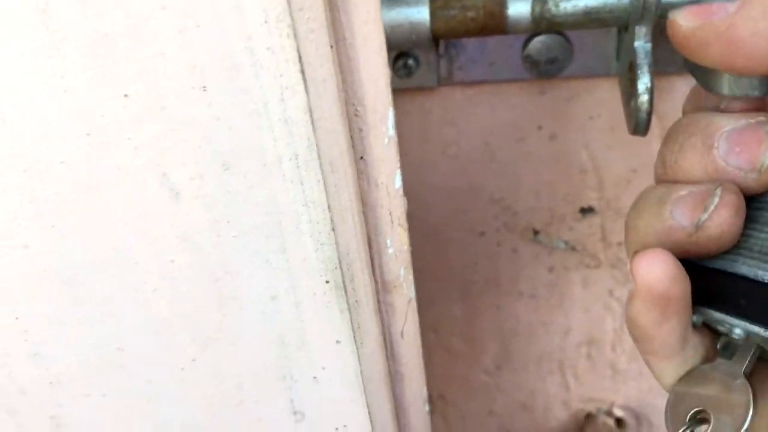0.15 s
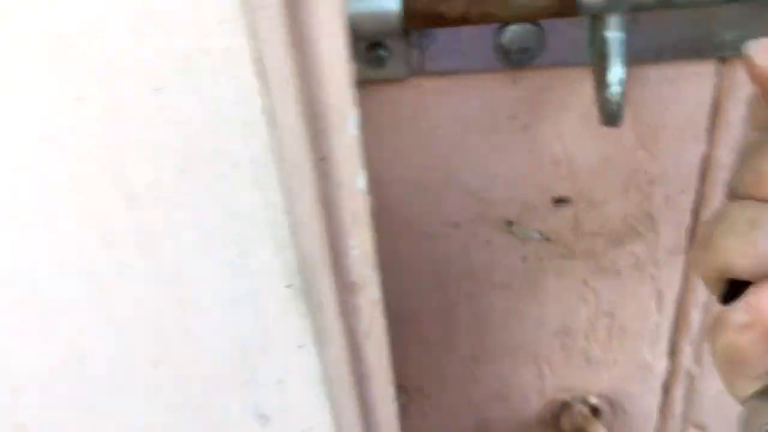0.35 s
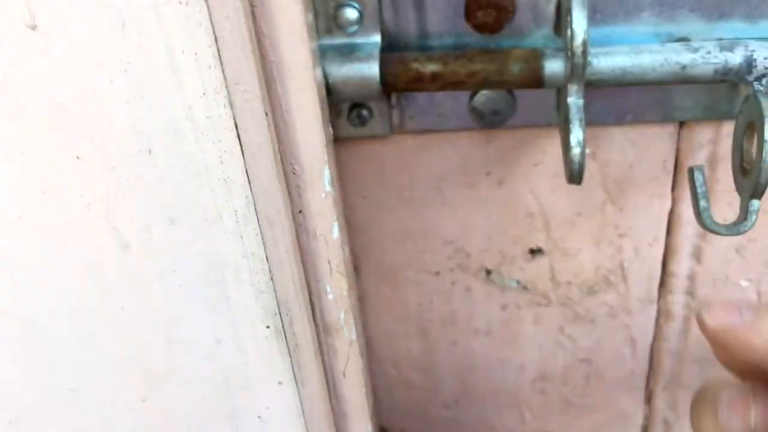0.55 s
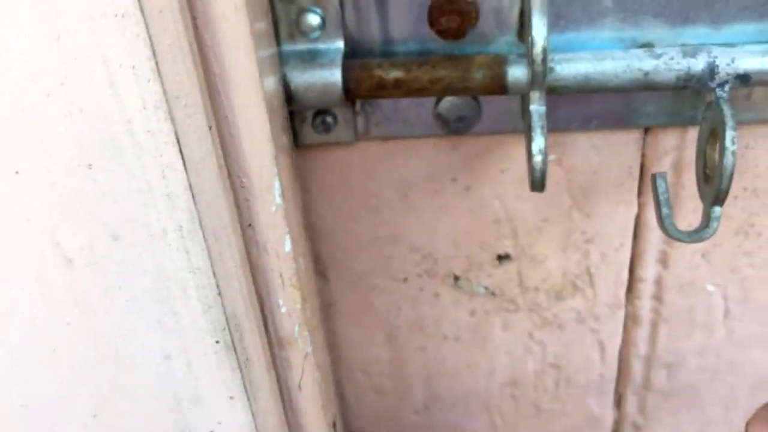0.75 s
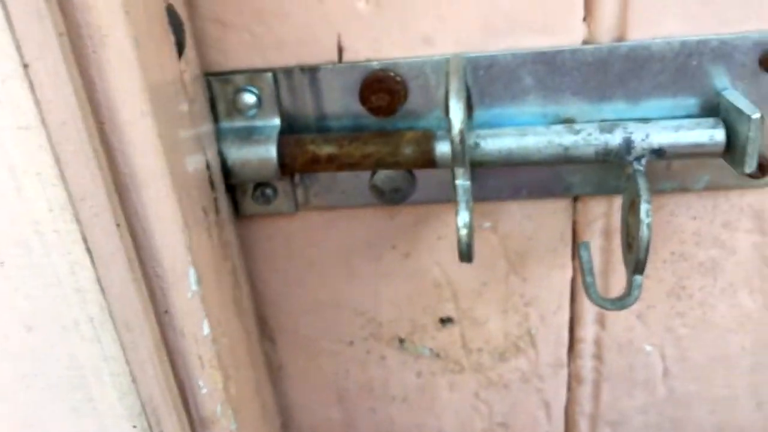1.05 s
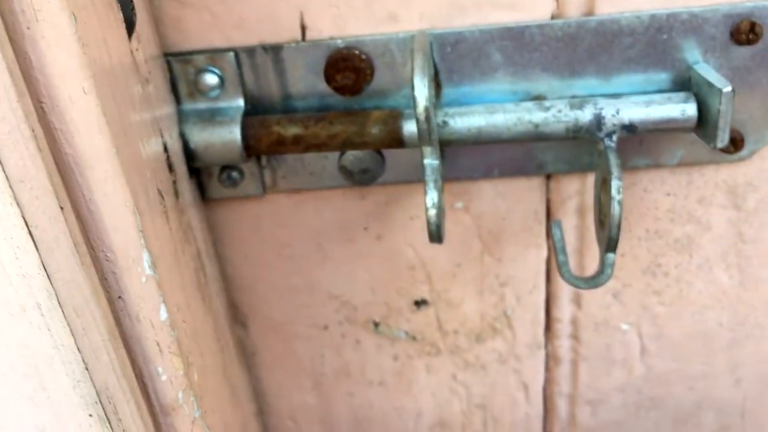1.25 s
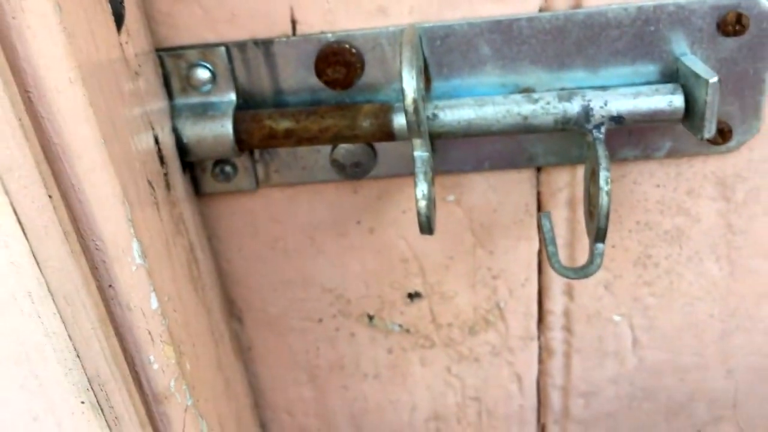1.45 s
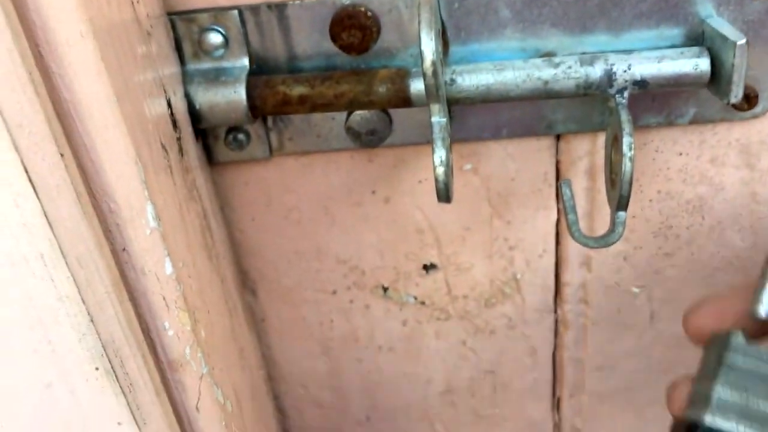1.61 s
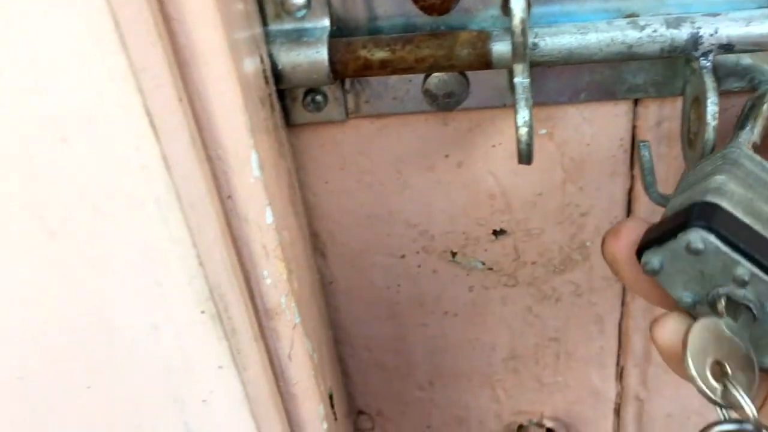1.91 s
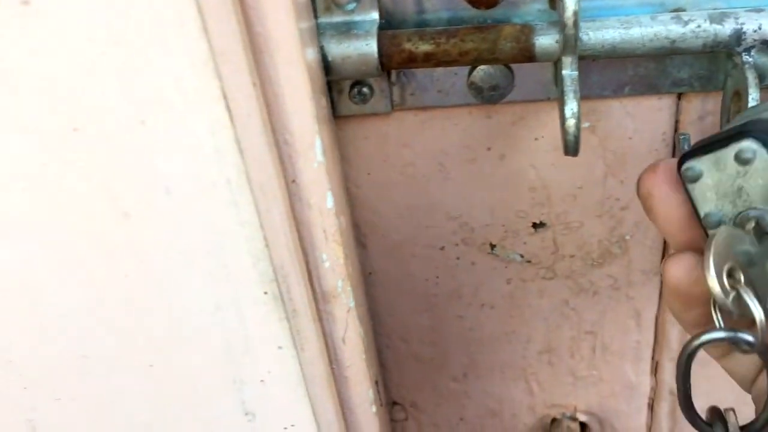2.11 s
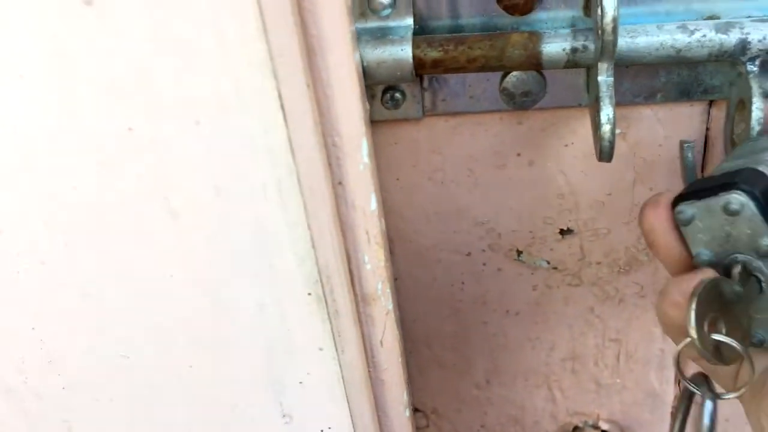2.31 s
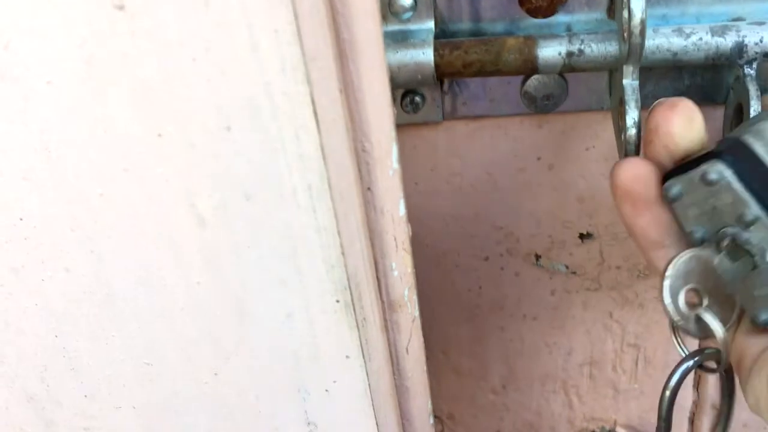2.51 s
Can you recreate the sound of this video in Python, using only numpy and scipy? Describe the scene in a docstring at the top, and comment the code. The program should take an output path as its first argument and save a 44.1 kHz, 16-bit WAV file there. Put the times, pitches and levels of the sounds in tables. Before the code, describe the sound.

A metal padlock clacks against a latch on a wooden door while small keys jingle brightly

```python
"""A steel padlock is pulled off the latch of a wooden stable door, carried a moment, then knocked back against it.
The hanging keys clink throughout as short, very high decaying modes, with noise and ticks at contact.
The first knocks crack in the steel and thump in the boards as damped modes; scrapes of random slips mostly swell.
Near 1.3 s the latch bolt rings faintly; later come stray key ticks, then more knocks with two deep door booms.
All the metal is close, with quick reflections, over filtered noise for a low outdoor rumble and soft hiss."""
import sys
import numpy as np
from scipy import signal
from scipy.fft import rfft, irfft
from scipy.io import wavfile
from scipy.ndimage import uniform_filter1d

SR = 44100
rng = np.random.default_rng(int(sys.argv[2]) if len(sys.argv) > 2 else 0)


def transcribe(u):
    """Save the signal u as a 16-bit wav file named by the first command-line argument.

    u: samples, shape (n,) or (channels, n), limited to [-1, 1]; the rate is SR.
    q: integer samples, one column per channel.
    """
    v = np.clip(np.atleast_2d(u).T, -1, 1)
    q = np.round(v * 32767).astype(np.int16)
    wavfile.write(sys.argv[1], SR, q)


N = 119070

# Free modes of the keys, plus the two lowest, which are the padlock shackle ringing along with them:
# frequency_hz, relative_level_db, t60_s
KEY_MODES = [(2100, -20, .05), (3176, -16, .06), (5350, -9, .03), (5715, 1, .045), (6150, -10, .02),
             (6730, -9, .025), (6900, -2, .055), (7030, -7, .04), (9150, -11, .02), (9550, -6, .025),
             (9860, -2, .045), (9950, 0, .05), (10450, -14, .02), (11555, 0, .075), (12100, -16, .03),
             (12890, -6, .045), (13030, 0, .06), (13170, -6, .04), (13550, -9, .02), (14750, -4, .02),
             (15470, 0, .04), (15620, -4, .03)]
# Free modes of the door boards: frequency_hz, relative_level_db, t60_s
DOOR_MODES = [(75.5, -11, .3), (112, -4, .1), (142.5, 2, .14), (183, -4, .14), (268, 1, .1), (370, -2, .07),
              (446, 0, .08), (561, -1, .08), (674, 2, .075), (790, -2, .07), (873, 0, .07), (952, -1, .07),
              (1051, -2, .06), (1170, -1, .06)]
# Free modes of the padlock and latch: frequency_hz, relative_level_db, t60_s
STEEL_MODES = [(1320, 4, .04), (1570, 2, .03), (1690, 1, .04), (2060, -6, .03), (2680, -2, .03),
               (2840, 0, .04), (3120, -7, .03), (3450, -1, .025), (3630, 1, .035), (3790, -2, .03),
               (4450, -2, .03), (5850, -1, .02), (6250, 0, .02), (6720, -1, .02), (7600, -2, .014),
               (8250, -4, .014), (10700, -3, .03), (11150, -5, .02), (12097, -3, .025), (12550, -1, .015),
               (12920, 0, .03)]


def amp(db):
    """Logarithmic level: decibels to amplitude gain."""
    return 10 ** (np.asarray(db, float) / 20)


def fade(t, t60):
    """Exponential damping: 60 dB down after t60 seconds."""
    return np.exp(-np.log(1000) * t / max(t60, 1e-3))


def blow(x):
    """Energy normalisation: give a burst the energy of 10 ms at rms 1."""
    return x * np.sqrt(0.01 * SR / (np.sum(x ** 2) + 1e-18))


def add(out, x, start):
    """Superposition: mix x into out from a start time in seconds."""
    i = min(max(int(start * SR), 0), N)
    out[i:i + len(x)] += x[:N - i]


def colour(x, points):
    """Spectral shaping through (frequency_hz, gain_db) points, then scaling to rms 1."""
    hz, db = np.array(points, float).T
    f = np.maximum(np.fft.rfftfreq(len(x), 1 / SR), 1)
    gain = amp(np.interp(np.log(f), np.log(hz), db))
    y = irfft(rfft(x) * gain, len(x))
    return y / y.std()


def ring(modes, t, length=1, detune=0., scatter_db=0.):
    """Modal superposition: damped sines of alternating sign, with chance pitch and level offsets."""
    total = 0
    for k, (hz, db, t60) in enumerate(modes):
        level_chance, pitch_chance = rng.standard_normal(2)
        gain = (-1) ** k * amp(db + scatter_db * level_chance)
        pitch = hz * (1 + detune * pitch_chance)
        total = total + gain * np.sin(2 * np.pi * pitch * t) * fade(t, t60 * length)
    return total


def rebounds(gap, loss_db, count=3):
    """Inelastic rebound: one contact and its weaker bounces, unevenly spaced, at unit energy."""
    train = np.zeros(SR // 10)
    times = np.append(0, np.cumsum(gap * rng.uniform(0.66, 2, count)))
    places = np.minimum(times * SR, len(train) - 1).astype(int)
    train[places] = amp(-loss_db * np.arange(count + 1))
    return train / np.linalg.norm(train)


def walk(rate):
    """Band-limited chance: random knots, rate per second, joined by straight lines."""
    knots = rng.standard_normal(int(rate * N / SR) + 2)
    return np.interp(np.arange(N) * rate / SR, np.arange(len(knots)), knots)


def strikes(rows, modes, edges, crack, tick, bounce, detune, scatter_db):
    """Impact excitation: each blow rings modes, makes contact noise and bounces, band by band."""
    t, out = np.arange(SR // 4) / SR, np.zeros(N)
    tick_db, tick_t60 = tick
    bands = []
    for lo, hi in zip(edges, edges[1:]):
        band_filter = signal.butter(3, [lo, hi], "band", fs=SR, output="sos")
        bands.append((band_filter, [m for m in modes if lo <= m[0] < hi]))
    for start, length, *levels in rows:
        touch = rng.standard_normal(len(t)) * fade(t, tick_t60)
        hit = 0
        # Only bands that have a crack row sound
        for (band_filter, own_modes), db, (crack_db, crack_t60) in zip(bands, levels, crack):
            body = ring(own_modes, t, length, detune(length), scatter_db) + np.zeros(len(t))
            noise = rng.standard_normal(len(t)) * fade(t, crack_t60 * np.sqrt(length))
            filtered = signal.sosfilt(band_filter, np.array([body, noise, touch]) + 1e-18)
            tone, burst, click = map(blow, filtered)
            hit = hit + amp(db) * blow(tone + amp(crack_db) * burst + amp(tick_db) * click)
        add(out, signal.fftconvolve(hit, rebounds(*bounce)), start)
    return out


def padlock():
    """Impact coupling: lock, latch and boards ring together, plus a local resonance at each spot struck."""
    # Blows on the latch: start_s, ring_length_factor, spot_hz, spot_level_db, six band levels_db
    # (levels before the layer trim)
    knocks = [(0.2501, 0.22, 3590, -22.5, -31, -20.5, -14, -19.5, -22, -30),
              (0.2613, 1.06, 12097, -21, -19, -33, -12.5, -31, -22.5, -27),
              (0.264, 0.72, 2650, -26, -20, -16, -21, -22, -25.5, -21.5),
              (0.2689, 0.76, 1135, -26, -20, -20.5, -26, -27.5, -31, -23.5),
              (0.4982, 1.03, 1315, -15, -38, -19.5, -16.5, -29, -16, -26.5),
              (0.502, 1.28, 2710, -19.5, -44, -32, -30, -29, -22, -36.5),
              (0.5069, 0.75, 4430, -25.5, -34.5, -25, -21.5, -23, -29.5, -28),
              (1.3027, 0.58, 1764, -27.5, -40.5, -37, -30, -24.5, -33, -42),
              (1.895, 0.82, 1425, -57, -53, -42, -47.5, -63.5, -47, -53),
              (2.0137, 1.2, 1160, -39.5, -38, -40, -48, -50.5, -41, -55),
              (2.0401, 0.85, 7500, -26.5, -30.5, -22.5, -26, -28, -27.5, -30),
              (2.08, 1.16, 1590, -34, -16.5, -21, -29.5, -58, -51, -50),
              (2.094, 1.6, 580, -34, -32, -27, -44, -57, -52, -49),
              (2.1726, 1, 2995, -32, -29.5, -26.5, -30.5, -33, -33.5, -31),
              (2.21, 0.72, 1560, -35, -33.5, -34.5, -43, -39, -52, -54),
              (2.2524, 1.1, 4920, -42, -35, -25.5, -30, -37.5, -46, -57),
              (2.3021, 2.6, 1346, -28, -25, -38.5, -28.5, -31, -29, -39),
              (2.3109, 1.22, 2850, -24, -21, -18.5, -25.5, -28, -31, -28),
              (2.3296, 0.81, 3740, -17, -17, -26, -24.5, -19, -24, -34),
              (2.4062, 0.78, 1380, -23, -23.5, -28, -27.5, -29.5, -26.5, -31.5),
              (2.5908, 1, 2940, -39.5, -35, -39.5, -41, -47, -40, -50)]
    # Edges of the six bands: frequency_hz
    knock_bands = [55, 250, 800, 2300, 4400, 10000, 16500]
    # Contact noise in each band: level_against_modes_db, t60_s (before the ring length factor)
    knock_crack = [(-13, 0.1), (-7, 0.042), (-10, 0.07), (-3, 0.02), (0, 0.016), (-4, 0.014)]
    spot_t60_s, spot_damping_per_cycle = 0.03, 0.004  # t60 at the low limit; extra damping with pitch
    rows = [(start, length, *levels) for start, length, _, _, *levels in knocks]
    hits = strikes(rows, DOOR_MODES + STEEL_MODES, knock_bands, knock_crack,
                   tick=(-6, 0.0061),  # dB against the modes, t60 s
                   bounce=(0.004, 13.5),  # gap s before random spread, dB lost per bounce
                   detune=lambda length: 0.004, scatter_db=2.5)
    t = np.arange(SR // 10) / SR
    for start, length, hz, db, *_ in knocks:
        t60 = length / (1 / spot_t60_s + spot_damping_per_cycle * hz)
        add(hits, amp(db) * blow(np.sin(2 * np.pi * hz * t) * fade(t, t60)), start)
    return amp(-1.79) * hits


def keys():
    """Contact damping: small flat keys tap; a key pressed by its neighbours rings shorter and off pitch."""
    # Keys touching: start_s, ring_length_factor, six band levels_db (before the layer trim; the last is silent)
    clinks = [(0.011, 0.28, -50.5, -53, -46.5, -57, -50, -65), (0.0943, 1.5, -68, -66, -50, -64, -57, -59),
              (0.1125, 0.37, -51, -60, -41, -66, -50, -61), (0.1482, 1.5, -57, -72, -50, -48, -58, -64),
              (0.3108, 0.45, -55, -60, -44, -57, -63, -68), (0.3545, 1.6, -52, -55.5, -41, -36, -43, -45),
              (0.5845, 0.099, -50, -61, -49.5, -57, -58, -54), (0.6041, 1.3, -60, -69, -53, -46, -55, -54),
              (0.6962, 1.13, -46, -54, -34, -33, -42, -42),
              (0.7543, 1.08, -47, -47.5, -46.5, -38, -44.5, -52.5),
              (0.9613, 0.36, -67, -57, -53.5, -65, -47.5, -59.5),
              (0.9915, 0.86, -41, -44, -37.5, -41.5, -33.5, -56.5),
              (1.0282, 0.44, -53, -48.5, -41.5, -56.5, -38.5, -51.5),
              (1.0405, 0.3, -55, -50, -41, -55, -45, -56.5),
              (1.3385, 4.5, -55, -50.5, -37, -60.5, -37, -53.5),
              (1.4083, 0.35, -43, -48, -35, -43, -40, -45),
              (1.519, 0.13, -51.5, -57, -42.5, -46.5, -62, -57.5),
              (1.552, 0.18, -50, -64, -45, -53, -45, -56), (1.561, 0.54, -50, -51, -39, -48, -47, -46),
              (1.6478, 0.56, -41, -34, -28.5, -23, -31, -37),
              (1.6615, 1.23, -31.5, -27.5, -22, -19, -16.5, -34),
              (1.683, 0.35, -43, -31, -31, -32.5, -23, -51), (1.7742, 0.36, -50, -45, -41.5, -48, -45, -57),
              (1.7979, 0.96, -53, -57, -44, -46, -64, -73),
              (1.8882, 0.73, -45.5, -47, -35.5, -33.5, -41.5, -46.5),
              (1.9206, 0.15, -58, -63, -43, -52, -50, -56), (2.0122, 0.84, -55.5, -51, -43, -39, -49, -54),
              (2.1702, 1.6, -41, -43, -35, -24.5, -35, -34), (2.3008, 0.28, -42, -43, -31.5, -33, -26, -51),
              (2.3888, 0.3, -56, -57, -31, -35, -38, -44), (2.4455, 0.74, -38, -45, -25.5, -44, -34, -38),
              (2.5228, 0.33, -54, -62, -37, -62, -56, -56), (2.5525, 1.1, -47, -53, -40.5, -38.5, -50, -53),
              (2.6015, 0.18, -54, -61, -33.5, -51, -45, -45)]
    # Edges of the six bands, of which the lower five sound: frequency_hz
    key_bands = [1900, 6400, 8000, 10800, 12300, 14200, 16500]
    # Contact noise in each of the five bands: level_against_modes_db, t60_s (before the ring length factor)
    key_crack = [(-14, 0.056), (-13, 0.037), (-10, 0.014), (-15.5, .025), (-0.5, 0.03)]

    def press_detune(length):
        """Added stiffness: the relative pitch spread grows as the ring is shortened."""
        return 0.0035 * np.clip(1 / length - 1, 0.15, 4)

    hits = strikes(clinks, KEY_MODES, key_bands, key_crack,
                   tick=(-14.5, 0.0012),  # dB against the modes, t60 s
                   bounce=(0.0034, 8),  # gap s before random spread, dB lost per bounce
                   detune=press_detune, scatter_db=4)
    return amp(-1.47) * hits


def scraping():
    """Stick-slip friction: the shackle's dense tiny slips in the staple judder and ring the steel."""
    # Steel on steel: start_s, length_s, low_grind_end_db, high_rasp_end_db, rise_db (before judder)
    scrapes = [(0.207, 0.015, -44.5, -45.5, 4), (0.223, 0.034, -21.5, -20, 13),
               (0.308, 0.033, -44, -45.5, 0), (0.452, 0.031, -38, -50, 12.5),
               (0.486, 0.026, -24.5, -33.5, 5.5), (1.214, 0.086, -50, -55.5, 13),
               (1.843, 0.042, -52, -64.5, 0.5), (2.016, 0.0207, -39, -57, 1.5), (2.08, 0.22, -47.5, -54, 9),
               (2.372, 0.0294, -33.5, -42, 11), (2.44, 0.056, -42.5, -52, 6),
               (2.511, 0.068, -51.5, -59, -8)]
    # Colour of the scraping: frequency_hz, relative_gain_db
    scrape_colour = [(150, -1.5), (450, 8.5), (1000, 4.5), (1700, -3), (3000, -8), (6000, -12),
                     (9000, -15.5), (13000, -10.5), (16000, -19)]
    slips_per_s, slip_scatter_db, steel_db, split_hz = 10000, 3, -10.5, 1500
    judder_per_s, judder_db = 130, 3.5
    slips = (rng.random(N) < slips_per_s / SR) * rng.choice([-1, 1], N)
    slips = slips * amp(slip_scatter_db * rng.standard_normal(N))
    response = ring(DOOR_MODES + STEEL_MODES, np.arange(SR // 10) / SR)
    steel = signal.fftconvolve(slips, response)[:N]
    rubbing = colour(slips, scrape_colour) + amp(steel_db) * colour(steel, scrape_colour)
    out = 0
    for k, side in enumerate(("low", "high")):
        part = signal.sosfilt(signal.butter(3, split_hz, side, fs=SR, output="sos"), rubbing)
        pressure = np.zeros(N)
        for start, length, *levels, rise_db in scrapes:
            rise = np.linspace(-rise_db, 0, max(int(length * SR), 2))
            add(pressure, amp(levels[k] + rise), start)
        out = out + part / part.std() * uniform_filter1d(pressure, size=130)
    return out * amp(judder_db * walk(judder_per_s))


def squeaks():
    """Friction-driven oscillation: sliding steel squeals briefly on one unsteady resonance."""
    # Squeals: start_s, length_s, pitch_hz (centre), level_db
    squeals = [(0.223, 0.031, 1710, -28.5), (2.264, 0.012, 2820, -44.5), (2.539, 0.027, 2850, -53.5)]
    waver_share = 0.015
    out, waver, grip = np.zeros(N), walk(900), amp(3 * walk(300))
    for start, length, hz, db in squeals:
        i, n = int(start * SR), int(length * SR)
        pitch = hz * (1 + waver_share * waver[i:i + n])
        tone = np.sin(2 * np.pi * np.cumsum(pitch) / SR) * grip[i:i + n]
        add(out, amp(db) * tone / tone.std() * signal.windows.tukey(n, 0.5), start)
    return out


def shimmer():
    """Random excitation: sliding keys make dense tiny contacts that keep their damped modes ringing."""
    # Keys sliding: start_s, length_s, start_level_db, loss_db over the slide
    key_rubs = [(1.349, 0.05, -43, 10), (1.648, 0.046, -29.5, 5.5), (2.066, 0.033, -46, -2),
                (2.423, .03, -44, 5), (2.576, 0.077, -51.5, 5)]
    # Colour of the shimmer: frequency_hz, relative_gain_db
    rub_colour = [(1500, -27), (4500, -17), (7000, 7), (9700, 4), (11600, -2), (13100, 8), (16000, -1)]
    contacts_per_s, ring_length_factor = 700, 0.55
    contacts = (rng.random(N) < contacts_per_s / SR) * rng.standard_normal(N)
    key = ring(KEY_MODES, np.arange(SR // 10) / SR, ring_length_factor)
    ringing = colour(signal.fftconvolve(contacts, key)[:N], rub_colour)
    pressure = np.zeros(N)
    for start, length, db, loss_db in key_rubs:
        loss = np.linspace(0, loss_db, max(int(length * SR), 2))
        add(pressure, amp(db - loss), start)
    return ringing * uniform_filter1d(pressure, size=260)


def ticks():
    """Random impacts: brushing keys give faint stray ticks, each a short modal ring."""
    t, out = np.arange(SR // 10) / SR, np.zeros(N)
    first_s, last_s, ticks_per_s, tick_db = 1.45, 2.65, 28, -49
    for start in rng.uniform(first_s, last_s, int(ticks_per_s * (last_s - first_s))):
        gain = amp(tick_db + 2 * rng.standard_normal())
        add(out, gain * blow(ring(KEY_MODES, t, length=0.2, detune=0.02)), start)
    return out


def bolt():
    """Free vibration: after a blow the latch bolt's modes sing on faintly in a diffuse wash."""
    # Ringing of the bolt: start_s, gain_db
    bolt_rings = [(1.302, -47)]
    # Modes of the bolt: frequency_hz, relative_level_db, t60_s
    bolt_modes = [(1020, -5.5, 0.61), (1800, 21.5, 0.04), (1926, 23.5, 0.015), (2060, -13.5, 0.34),
                  (3150, 8, 0.3), (3800, -19, .4), (3962, -15, 0.54), (9640, -3, 0.25)]
    # Colour of the wash: frequency_hz, relative_gain_db
    wash_colour = [(200, -10), (600, -1), (1050, 1.5), (1500, -11.5), (2000, -4), (2800, -16.5), (4000, -6),
                   (5500, -18), (12000, -12.5)]
    wash_db, wash_t60_s = -2.5, 1.44
    t, out = np.arange(SR) / SR, np.zeros(N)
    for start, db in bolt_rings:
        noise = colour(rng.standard_normal(len(t)), wash_colour)
        wash = amp(wash_db) * noise * fade(t, wash_t60_s)
        add(out, amp(db) * (ring(bolt_modes, t) + wash), start)
    return out


def door():
    """Plate resonance: the loose boards shudder in low noise swells and boom after heavy blows."""
    # Shudders as the door is handled: start_s, length_s, centre_hz, level_db (before the swell)
    shudders = [(0.326, 0.12, 109, -38), (1.527, 0.34, 59.4, -38.5)]
    # Booms of the whole door: start_s, level_db (before onset and decay)
    booms = [(0.515, -41), (2.087, -19.5), (2.337, -24)]
    boom_hz, boom_t60_s, shudder_width = 76.3, 0.62, 0.6
    out, t = np.zeros(N), np.arange(SR) / SR
    spread = (1 + shudder_width) ** 3  # frequency ratio at which the hum is 60 dB down
    for start, length, hz, db in shudders:
        hum = colour(rng.standard_normal(N), [(hz / spread, -60), (hz, 0), (hz * spread, -60)])
        swell = np.hanning(int(length * SR))
        part = hum[:len(swell)]
        add(out, amp(db) * swell * part / part.std(), start)
    for start, db in booms:
        soft_onset = 1 - fade(t, 0.05)
        add(out, amp(db) * np.sin(2 * np.pi * boom_hz * t) * fade(t, boom_t60_s) * soft_onset, start)
    return out


def yard(x):
    """Diffuse reflection: convolution with decaying noise for door and hand, and a faint longer tail."""
    # Colour of the reflections: frequency_hz, relative_gain_db
    yard_colour = [(80, 9), (300, 12.5), (1000, -1.5), (4000, -3), (9000, -2), (15000, -10.5)]
    near_db, near_t60_s, far_db, far_t60_s = -21, 0.11, -32.5, 0.21
    t = np.arange(SR // 2) / SR
    response = 0
    for db, t60 in (near_db, near_t60_s), (far_db, far_t60_s):
        soft_onset = 1 - fade(t, 0.023)
        tail = colour(rng.standard_normal(len(t)), yard_colour) * fade(t, t60) * soft_onset
        response = response + amp(db) * tail / np.linalg.norm(tail)
    return signal.fftconvolve(x, response)[:N]


def air():
    """Broadband noise: a low outdoor rumble of changing level and a steady soft hiss."""
    # Colour of the rumble: frequency_hz, relative_gain_db
    rumble_colour = [(15, -32), (30, -9), (55, -1), (100, -7), (165, -4), (260, -14), (400, -25.5),
                     (800, -31.5), (2000, -37), (6000, -54), (16000, -76.5)]
    # Level of the rumble: time_s, level_db
    rumble_level = [(0, -44.5), (.2, -49), (.38, -41), (.55, -47), (1.0, -49), (1.45, -47), (1.62, -49),
                    (1.76, -54.5), (1.86, -46), (2.45, -40.5), (2.7, -46)]
    # Colour of the hiss: frequency_hz, relative_gain_db
    hiss_colour = [(300, 4), (1000, 2.5), (2000, -8.5), (4000, -4), (7000, -8), (10000, -10), (13000, -6.5),
                   (16000, -10)]
    hiss_db = -59.5
    times, levels = np.array(rumble_level).T
    level = amp(np.interp(np.arange(N) / SR, times, levels))
    rumble = level * colour(rng.standard_normal(N), rumble_colour)
    return rumble + amp(hiss_db) * colour(rng.standard_normal(N), hiss_colour)


def scene():
    """Linear superposition of the metal, its reflections, the door and the background."""
    metal = padlock() + keys() + scraping() + squeaks() + shimmer() + ticks() + bolt()
    return (metal + yard(metal) + door() + air())[None]


def record(dry):
    """Amplitude and band limiting: peaks clip at 0.8, then a steep low-pass cuts the top."""
    low_pass = signal.ellip(8, 0.2, 70, 16200, fs=SR, output="sos")  # 0.2 dB ripple, 70 dB stop, Hz
    return signal.sosfilt(low_pass, np.clip(dry, -0.8, 0.8))


dry = scene()
out = record(dry)
transcribe(out)
```